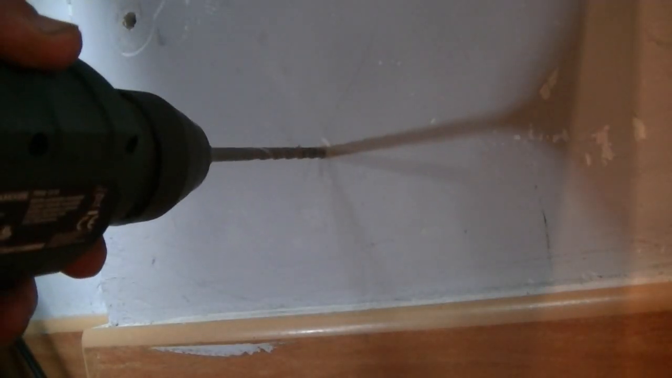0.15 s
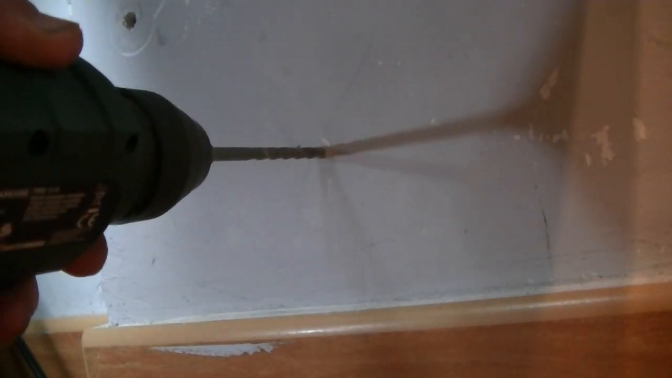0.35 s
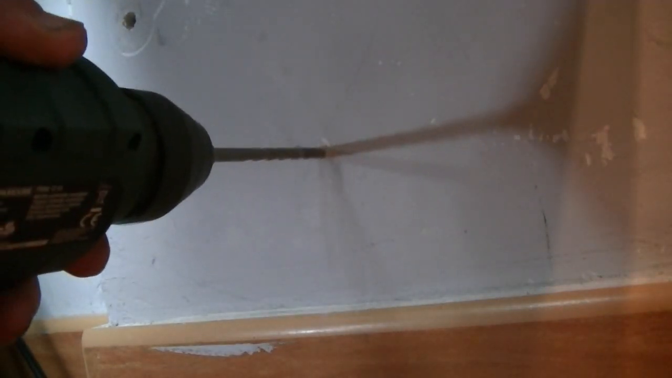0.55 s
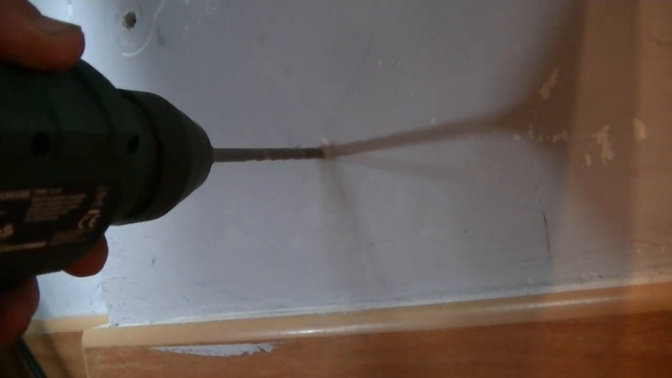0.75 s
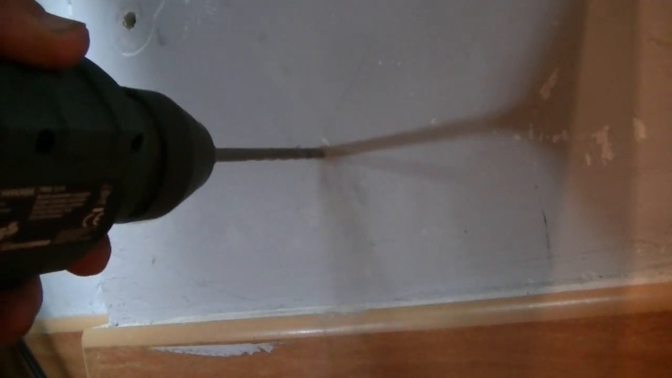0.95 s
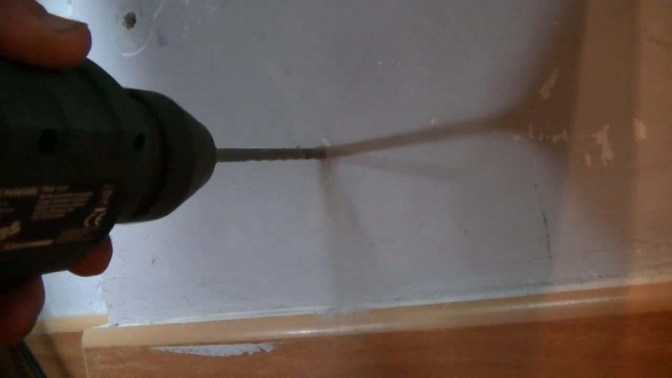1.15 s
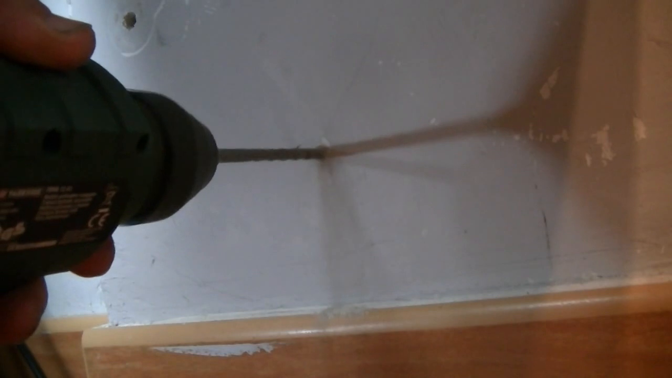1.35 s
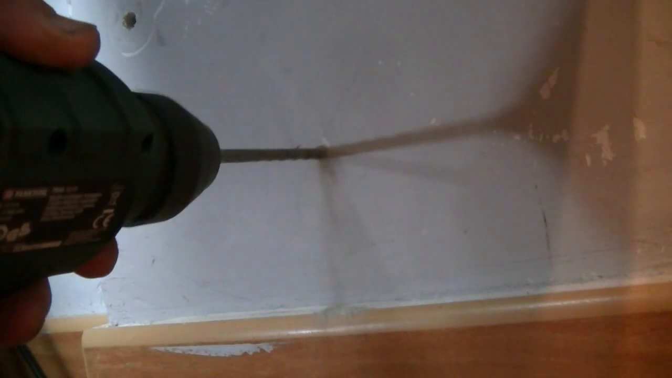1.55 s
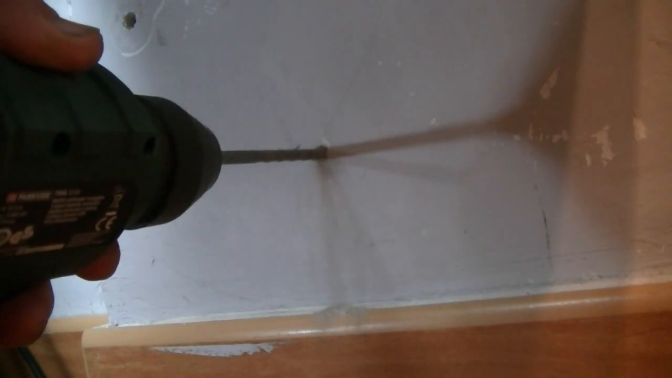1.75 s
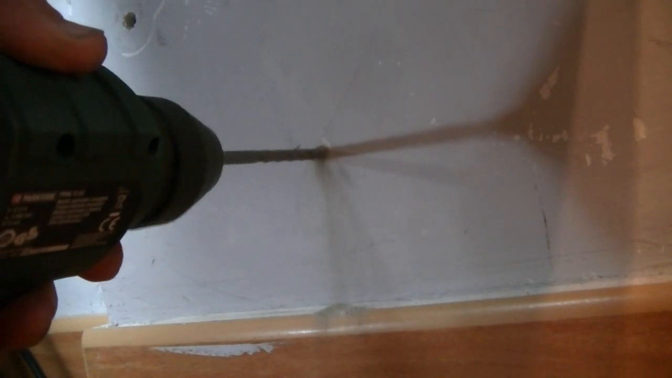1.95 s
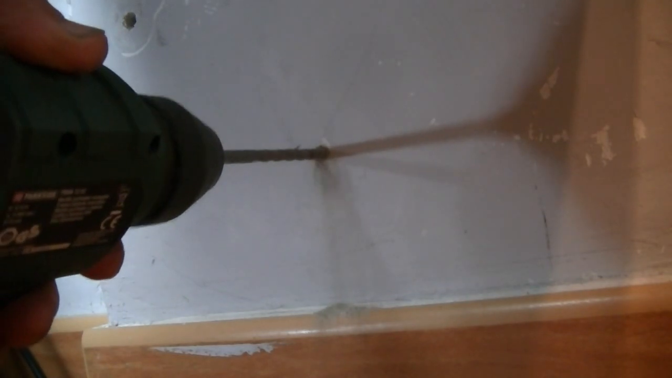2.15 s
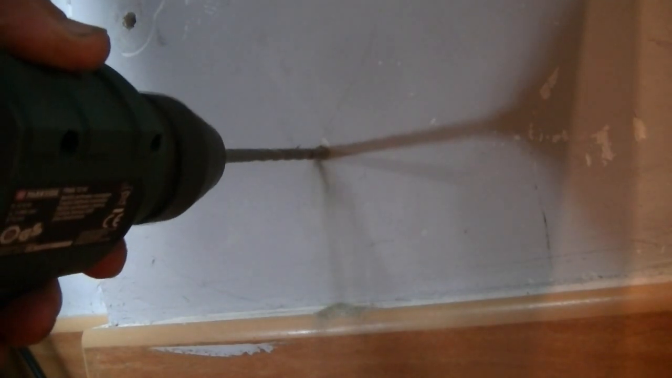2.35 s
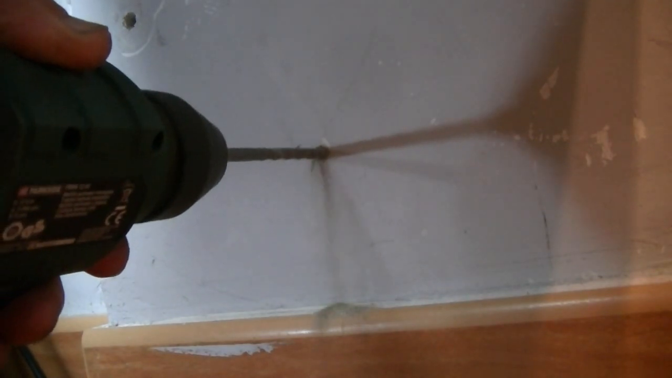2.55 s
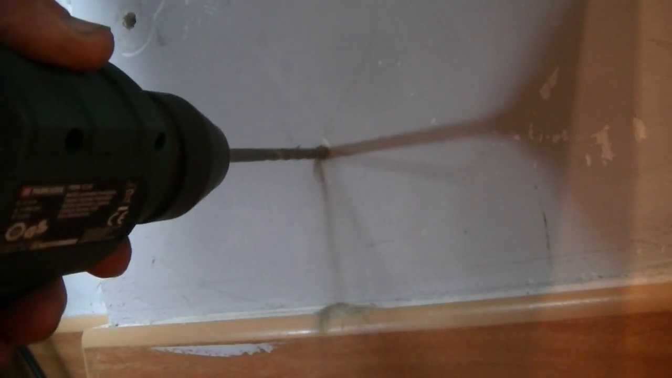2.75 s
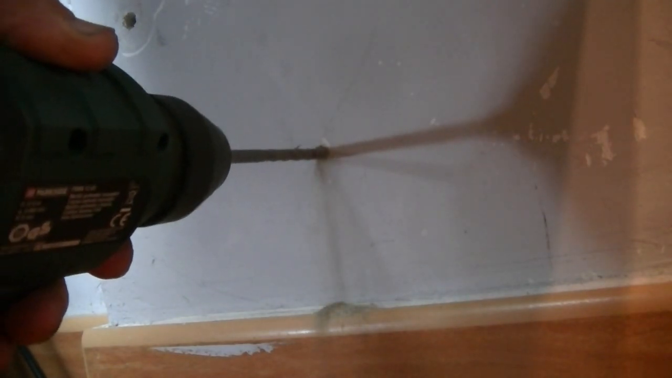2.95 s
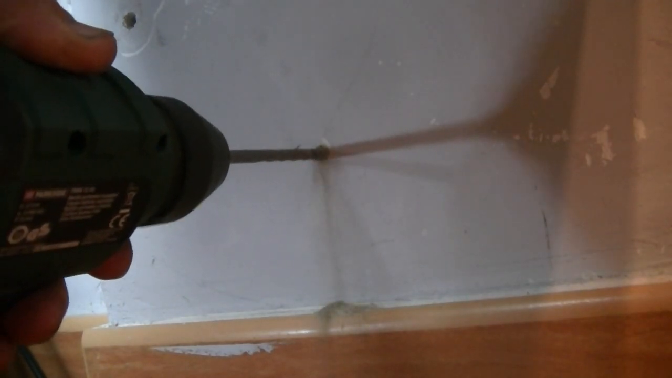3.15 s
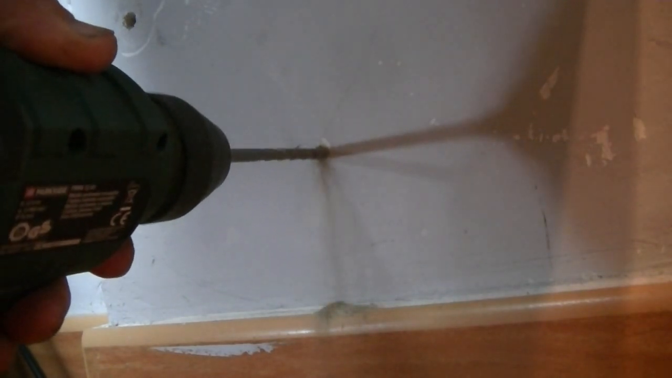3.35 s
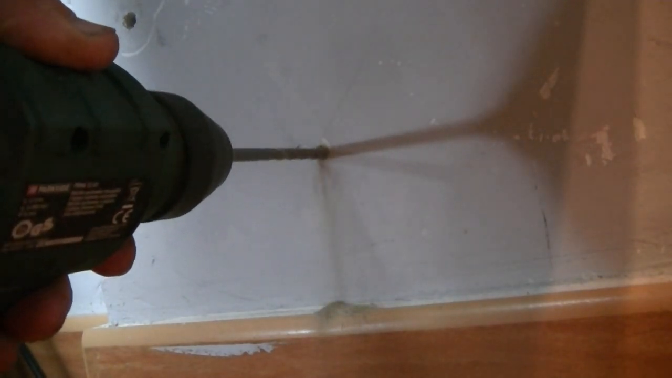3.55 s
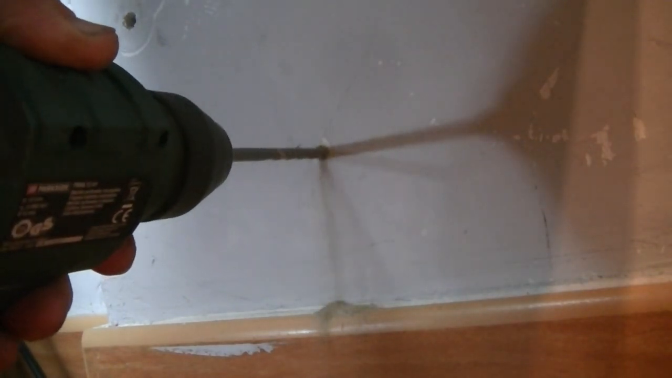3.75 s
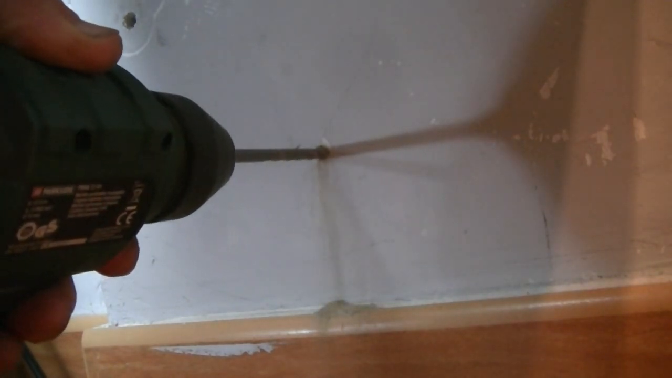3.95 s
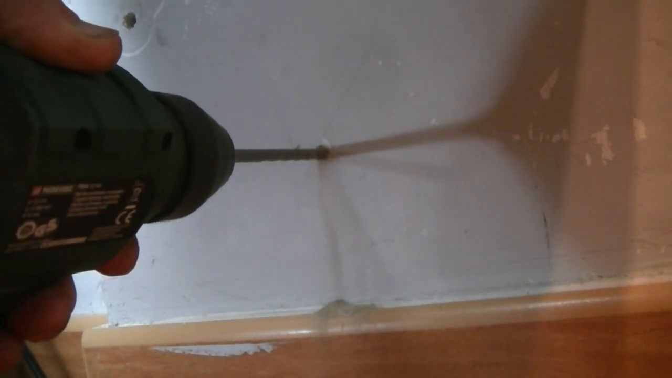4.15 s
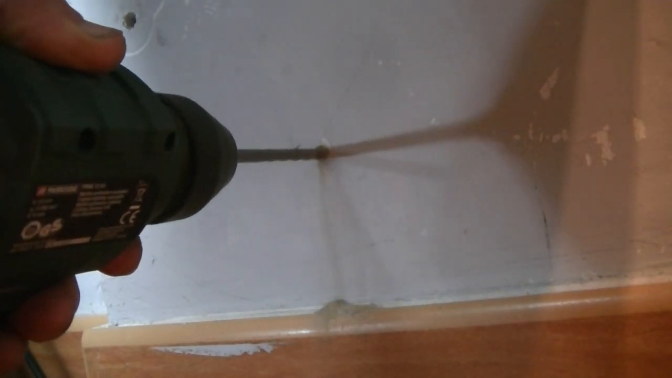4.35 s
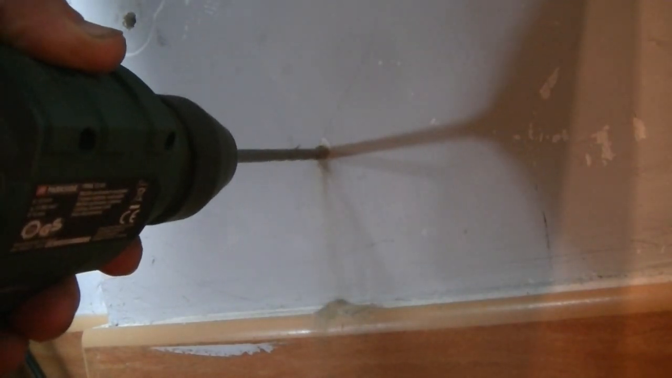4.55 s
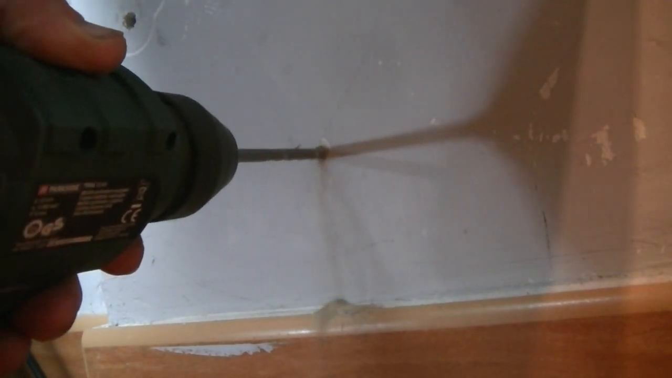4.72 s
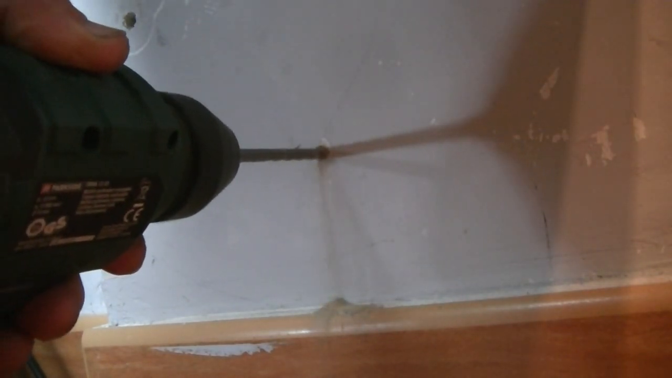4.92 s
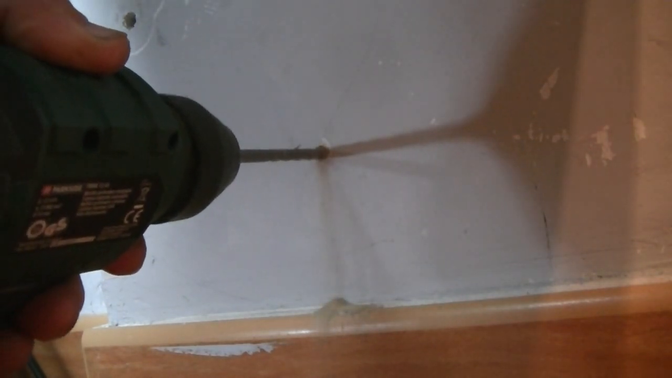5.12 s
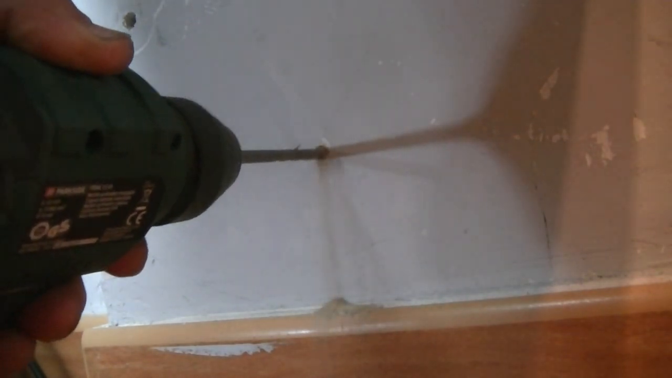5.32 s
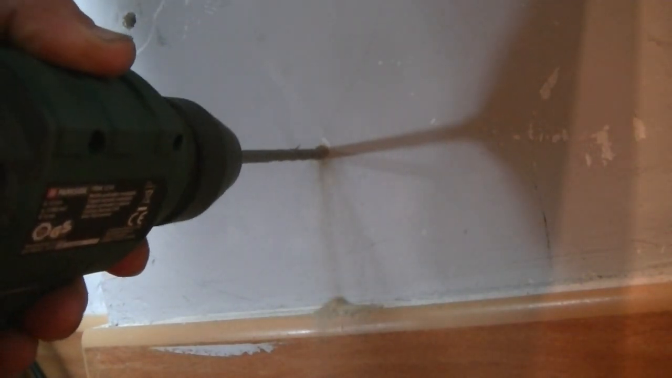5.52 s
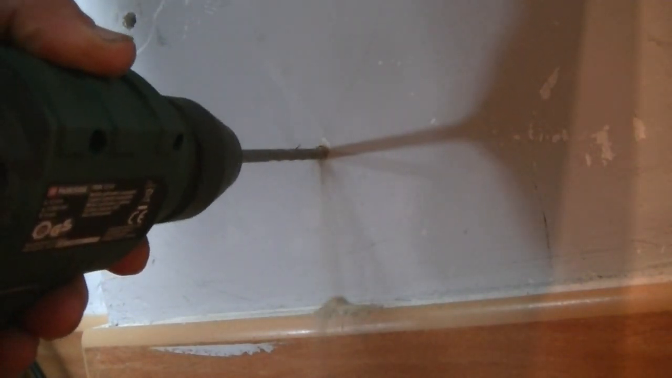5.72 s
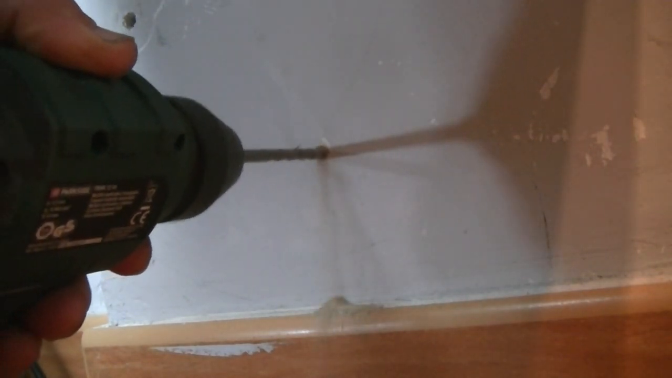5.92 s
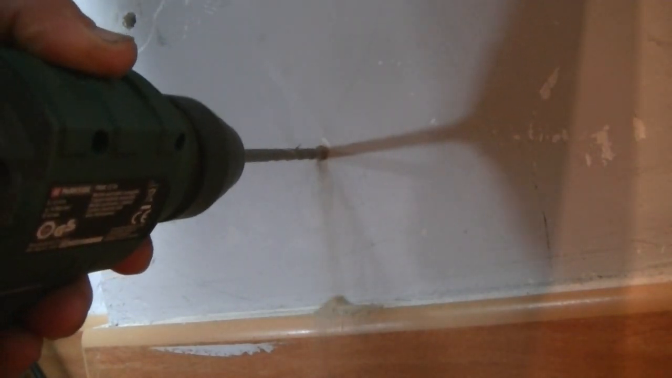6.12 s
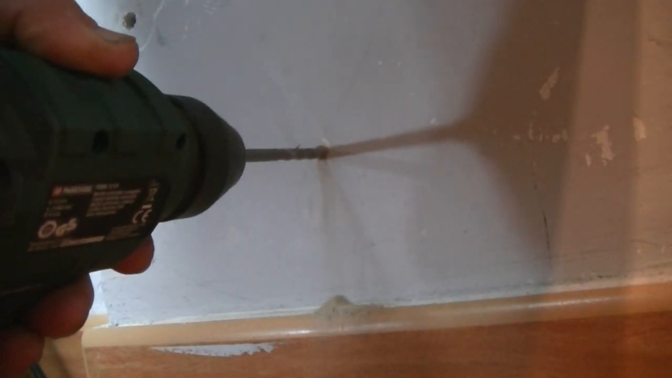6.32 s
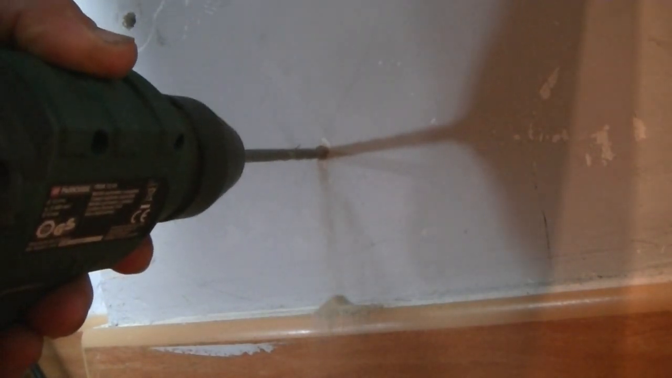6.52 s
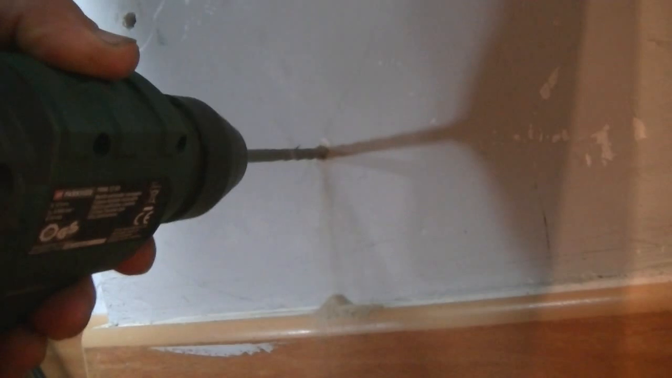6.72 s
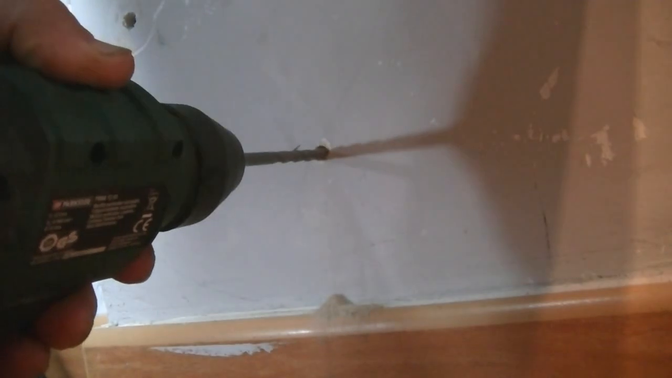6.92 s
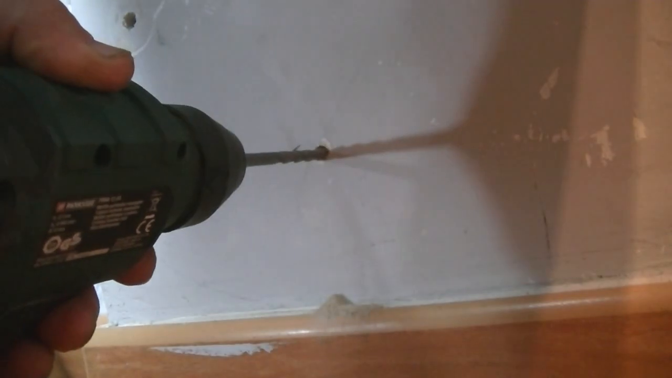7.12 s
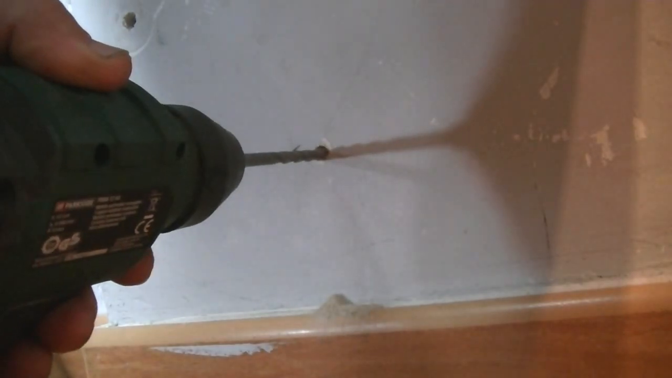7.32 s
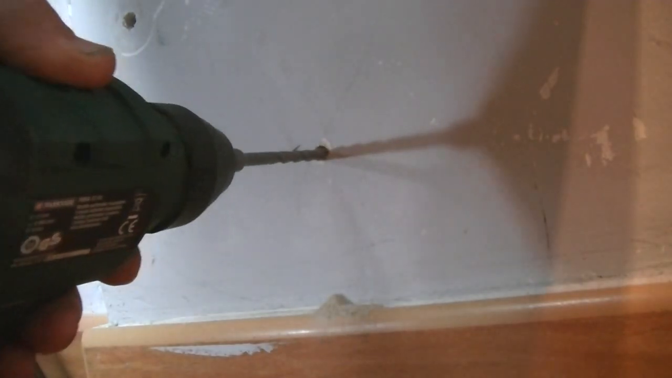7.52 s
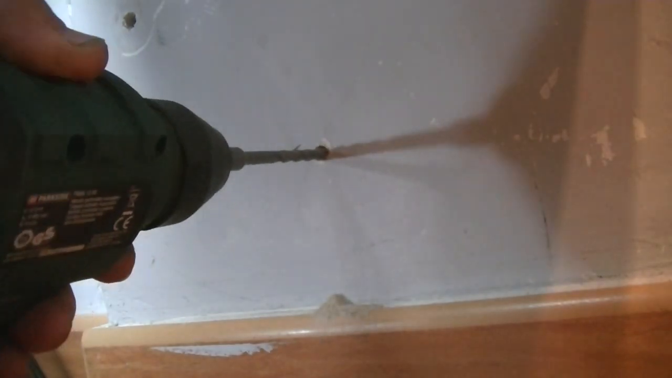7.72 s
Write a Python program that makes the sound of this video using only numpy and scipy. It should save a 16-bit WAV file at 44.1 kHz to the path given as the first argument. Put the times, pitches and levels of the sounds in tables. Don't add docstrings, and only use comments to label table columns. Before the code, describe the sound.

A hammer drill revs up and hammers steadily into a plastered wall, then stops abruptly, followed by small knocks, scrapes and quiet room air.

```python
import sys
import numpy as np
from scipy import signal
from scipy.fft import rfft, irfft, next_fast_len
from scipy.io import wavfile
from scipy.ndimage import uniform_filter1d, map_coordinates

SR = 44100
rng = np.random.default_rng(int(sys.argv[2]) if len(sys.argv) > 2 else 0)


def to_linear_factor(level_db):
    exponent = np.asarray(level_db, float) / 20
    return 10 ** exponent


def dump_mix(stems):
    frames = np.atleast_2d(stems).T
    limited = np.clip(frames, -1, 1)
    pcm = np.round(limited * 32767).astype(np.int16)
    wavfile.write(sys.argv[1], SR, pcm)


N = 347508
T = np.arange(N) / SR
STOP_S = 6.795

# t/s, rate/(blows per s)
CRANK_SPEED = [(0.0, 23.39), (0.07, 32.27), (0.14, 36.75), (0.48, 36.94), (0.53, 41.01), (0.57, 53.62),
               (0.62, 62.01), (0.68, 65.43), (1.05, 66.25), (2.1, 66.75), (2.25, 67.6), (2.55, 66.69),
               (2.85, 67.52), (3.9, 67.43), (6.0, 66.89), (6.66, 66.13), (6.7, 64.4), (6.8, 31.5)]
# t/s, level/dB, steel level/dB
WORKLOAD = [(0, -15.5, -5), (.06, -20, -4), (.35, -21, -2), (.65, -20.5, -4.5), (1, -21, -6),
            (1.4, -20, -10), (1.9, -19.5, -10), (2.8, -20.5, -5), (3.3, -21, -5.5), (4, -21, -8.5),
            (4.7, -21, -7.5), (5.4, -21.5, -9), (6, -21, -8.5), (6.6, -22, -7), (6.72, -22, -2),
            (6.79, -27.5, -4)]
# f/Hz, width/Hz, level/dB
WALL_MODES = [(460, 89, 1.5), (558, 62, 3.5), (622, 38, -11), (737, 70, -5.5), (324.5, 64, -17.5)]
# f/Hz, width/Hz, level/dB
HOLLOW_MODES = [(950, 75, -5), (1209, 70, 1.5), (1441, 50, -2), (1670, 50, 0)]
# f/Hz, width/Hz, level/dB
HOUSING_MODES = [(1950, 135, 4), (2317, 246, -4), (2505, 117, -1.5), (2720, 73, -4), (2850, 26, 0.5),
                 (3420, 187, -6), (3830, 274, -13), (4440, 300, -15)]
# f/Hz, width/Hz, level/dB
SKIN_MODES = [(760, 200, -10.5), (1268, 220, -6.5), (1500, 92, 7.5), (3300, 830, -6)]
# f/Hz, width/Hz, level/dB
STEEL_MODES = [(6370, 750, -3), (9820, 370, 0), (11000, 1100, -10), (14300, 1100, -19)]
# f/Hz, level/(dB per Hz)
GRIND_SLOW_SPECTRUM = [(150, -69), (250, -55), (435, -8.5), (884, -12.5), (1440, -4.5), (4270, -5.5),
                       (7560, -21.5), (10100, -24.5), (12300, -38), (13400, -31), (15600, -54)]
# f/Hz, level/(dB per Hz)
GRIND_FAST_SPECTRUM = [(150, -80.5), (250, -29.5), (458, -13), (535, -15.5), (648, -8.5), (1030, -6.5),
                       (1190, -5.5), (1340, -5.5), (1930, 1.5), (2210, -2.5), (4420, -5.5), (4900, -8),
                       (9970, -21), (13800, -34.5), (15600, -48.5)]
# f/Hz, level/(dB per Hz)
CRACK_SPECTRUM = [(600, -55.5), (1500, -7.5), (3000, -6.5), (5000, -8), (8000, -15), (12000, -20),
                  (15500, -25)]
# t/s, peak level/dB, f/Hz, t60/s, click level/dB
TOOL_KNOCKS = [
    (7.007, -41, 670, 0.1, -47),
    (7.063, -33, 972, 0.13, -40),
    (7.082, -49, 2400, 0.06, -30),
    (7.383, -36.5, 2170, 0.06, -20),
    (7.401, -29, 3420, 0.044, -20),
    (7.425, -30, 2500, 0.06, -22),
    (7.451, -34, 1870, 0.06, -14),
    (7.566, -17.5, 2010, 0.05, -35),
    (7.566, -19, 1390, 0.04, -6.5),
    (7.586, -36, 1260, 0.052, -24),
]
# start t/s, hold/s, fade t60/s, level/dB, brightness/dB
BIT_SCRAPES = [
    (7.064, .014, .03, -61, -30),
    (7.076, 0.035, 0.14, -47.5, -30),
    (7.14, .01, .42, -66, -9),
    (7.38, 0.027, .05, -45, -14),
    (7.42, 0.011, .05, -43.5, -7),
    (7.449, .006, .05, -51, -7),
    (7.582, .052, .04, -51.5, -16),
    (7.854, .03, .05, -45, -13),
]
# f/Hz, level/(dB per Hz)
SCRAPE_SPECTRUM = [(240, -55), (400, -14), (2140, -12), (2430, 5.5), (2860, -8), (4830, -24), (5190, -31),
                   (8400, -26), (8900, -26), (13000, -46)]
# f/Hz, width/Hz, level/dB
LOOSE_BIT_LOW = [(990, 300, -15), (1510, 220, 1.5), (2400, 170, 3), (2790, 200, 0), (3420, 400, -1.5),
                 (4800, 340, -18)]
# f/Hz, width/Hz, level/dB
LOOSE_BIT_HIGH = [(4900, 400, 5.5), (6800, 400, 3), (8260, 500, 1), (10500, 800, -18)]
# start t/s, end t/s, f/Hz, width/Hz, level/dB
DUST_WHISPERS = [(7.062, 7.2, 2400, 120, -61), (7.06, 7.15, 1150, 1200, -57),
                 (7.564, 7.595, 1330, 250, -47), (7.42, 7.45, 2700, 200, -50),
                 (7.013, 7.09, 9500, 900, -74), (7.04, 7.2, 6600, 600, -78), (7.07, 7.18, 11000, 500, -80),
                 (7.27, 7.37, 3900, 200, -77), (7.47, 7.74, 5280, 200, -70.5), (7.6, 7.78, 8200, 400, -80),
                 (7.83, 7.87, 9700, 400, -76)]
# f/Hz, t60/s
ROOM_DECAY = [(150, .12), (300, 0.4), (1000, 0.27), (2000, 0.29), (5000, 0.31), (9000, 0.26), (14000, 0.18)]
# f/Hz, left minus right level/dB
LEFT_OVER_RIGHT = [(250, -.8), (500, -.4), (1000, .3), (2500, .8), (5000, .7), (8000, .1), (14000, .1)]
# t/s, level/dB
AIR_LEVEL = [(6.8, -83), (7, -69), (7.1, -59.5), (7.25, -65), (7.4, -57), (7.55, -54.5), (7.7, -52.5),
             (7.88, -53)]
# f/Hz, level/(dB per Hz)
AIR_SPECTRUM = [(88, -71), (150, -36), (350, -14), (386, -8), (433, -12), (701, -20), (1110, -22),
                (1250, -18.5), (2140, -15.5), (2600, -21.5), (4210, -19.5), (4540, -24.5), (15000, -54.5)]
# f/Hz, width/Hz, level/dB
APPLIANCE_LINES = [(483, 22, 2), (684, 40, -11.5), (3900, 200, -9.5)]
# f/Hz, level/dB
WIND_FILTER = [(20, -52), (150, -41.5), (200, -23), (265, -18.5), (330, -6.5), (420, -6.5), (600, -0.5)]
# f/Hz, level/(dB per Hz)
HISS_SPECTRUM = [(20, -3), (150, -4), (3000, -5), (9000, -4), (15000, -18)]


def unit(x):
    return x / np.sqrt(np.mean(x ** 2) + 1e-20)


def along(points, hz):
    f, v = np.transpose(points)
    return np.interp(np.log(hz + 1), np.log(f + 1), v)


def curves(rows):
    s, *cols = np.transpose(rows)
    return [np.interp(T, s, c) for c in cols]


def wobble(rate):
    return map_coordinates(rng.standard_normal(int(N * rate / SR) + 4), [T * rate])


def noise(*rows):
    return rng.standard_normal((*rows, N))


def filtered(x, response):
    m = next_fast_len(N + 8192)
    return irfft(rfft(x, m) * response(np.fft.rfftfreq(m, 1 / SR)), m)[..., :N]


def coloured(x, spectrum):
    return unit(filtered(x, lambda hz: to_linear_factor(along(spectrum, hz))))


def rung(x, modes):
    def response(f):
        total = 0
        for k, (centre, width, db) in enumerate(modes):
            damping = 1j * f * width
            total = total + (-1) ** k * to_linear_factor(db) * damping / (centre * centre - f * f + damping)
        return total
    return unit(filtered(x, response))


def pulses(times, sizes):
    at = times[:, None] * SR
    k = at.astype(int) + np.arange(16) - 8
    shape = np.sinc(k - at) * np.cos(np.pi * (k - at) / 18) ** 2
    return np.bincount(np.clip(k, 0, N - 1).ravel(), (sizes[:, None] * shape).ravel(), N)


def bursts(hits, rise, t60):
    t = np.arange(SR // 20) / SR
    envelope = (1 - np.exp(-t / rise)) * to_linear_factor(-60 * t / t60)
    return signal.fftconvolve(hits, envelope)[:N] * noise()


def strikes(rate, turn):
    at = np.interp(np.arange(436), turn, T, left=-.0125)
    luck = rng.standard_normal((len(at), 6))
    blow_s = at - .0005 + .00003 * luck[:, 0]
    flight = .0137 + .0005 * np.clip(36.5 - np.interp(at, T, rate), 0, 12)
    back_s = at + flight + .00006 * luck[:, 1]
    blows = pulses(blow_s[1:], to_linear_factor(0.45 * luck[1:, 2]))
    backs = pulses(back_s, to_linear_factor(1.3 * luck[:, 3]))
    thumps = pulses(at + flight - .0028, to_linear_factor(0.36 * luck[:, 4]))
    jolt = bursts(pulses(blow_s[1:], to_linear_factor(2.8 * luck[1:, 5])), 0.00053, 0.011)
    return blows, backs, thumps, jolt


def pressure(part, fast):
    lift = np.exp(-((part - .36 + .06 * fast) / (.15 - .04 * fast)) ** 2)
    return to_linear_factor(-8.5 * lift + 3 * part + 0.6 * wobble(150) + 0.4 * wobble(8))


def worn_teeth(part):
    teeth = rng.standard_normal(256) + .35 * rng.standard_normal((32, 256))
    return map_coordinates(teeth, [T * 3.5, part * 256], mode="grid-wrap")


def wall_and_housing(blows, backs, thumps, chatter, fast, depth):
    seating_db = -20 * np.exp(-T / 0.018)
    wall_db = -17 + 7 * fast - 0.8 * depth
    hollow_db = -6 - 3 * fast - 1.5 * depth + seating_db
    skin_db = -8 * np.clip(depth * 3.0, 0, 1) - 6 * fast + seating_db / 2
    wall = rung(thumps + 0.15 * backs + 0.029 * bursts(backs, 0.0016, 0.035), WALL_MODES)
    hollow_drive = blows - 0.29 * backs + 0.011 * chatter
    hollow = rung(hollow_drive + 0.071 * bursts(blows, 0.0017, 0.034), HOLLOW_MODES)
    housing_drive = .8 * blows + backs + .028 * chatter
    housing = rung(housing_drive + .065 * bursts(blows + backs, .0003, .018), HOUSING_MODES)
    skin = rung(blows + 0.04 * bursts(blows, 0.0003, .01), SKIN_MODES)
    click = rung(backs, [(2530, 590, 0)])
    thud = rung(rung(blows, [(206, 360, 0)]), [(209, 280, 0)])
    rattle = rung(chatter, [(442.0, 30, 0.5), (640, 82, -3.5), (917, 260, -2.0)])
    shank = rung(blows + backs, [(3850, 140, 0)])
    body = to_linear_factor(wall_db - 2.0) * wall + to_linear_factor(hollow_db - 3.5) * hollow
    body = body + to_linear_factor(-6.5) * housing + to_linear_factor(-4.0) * to_linear_factor(skin_db) * skin
    body = body + to_linear_factor(-15 + 5.6 * fast - 9.8 * depth) * click
    body = body + to_linear_factor(-30) * to_linear_factor(4.4 * (1.0 - fast)) * thud
    body = body + to_linear_factor(-16.5 - 10.7 * fast) * rattle + to_linear_factor(-30 + 14 * depth) * shank
    return filtered(body, lambda f: 1 / (1 + 1j * f / 5500 - (f / 5500) ** 2) ** 2)


def cracking_stone(blows, backs):
    splinters = bursts(blows, 0.00024, 0.028) + 0.085 * bursts(backs, .0002, 0.0045)
    return coloured(0.4 * blows + splinters, CRACK_SPECTRUM)


def ringing_steel(jolt, grit, depth):
    tip = rung(jolt, [(13430, 290, 0)])
    lower = rung(jolt + 0.85 * grit, [(8580, 150, 0)])
    return rung(jolt, STEEL_MODES) + to_linear_factor(-6.5 - 16 * depth) * tip + to_linear_factor(-15.5 + 7.0 * depth) * lower


def grinding(grit, fast):
    slow_grind = np.sqrt(1 - fast) * coloured(grit[0], GRIND_SLOW_SPECTRUM)
    return slow_grind + np.sqrt(fast) * coloured(grit[1], GRIND_FAST_SPECTRUM)


def gear_whine(turn, press, fast):
    mesh = 2 * np.pi * 64 * turn + .3 * wobble(25)
    load = unit(press ** 1.15) * to_linear_factor(0.3 * wobble(30)) * fast ** 1.4
    tones = np.sin(mesh) + 0.85 * np.sin(mesh + 2 * np.pi * turn + 1.1)
    tones = tones + 0.4 * np.sin(mesh - 4 * np.pi * turn - 1.9)
    tones = tones + 0.45 * np.sin(mesh - 12 * np.pi * turn) + 0.45 * np.sin(mesh - 16 * np.pi * turn)
    return load * tones


def motor(turn, press, fast, depth):
    gear_db = -10 - 9 * depth ** 2
    hum = (1 - fast) * np.clip(T / .12, 0, 1) * np.sin(2 * np.pi * 12 * turn)
    rumble = coloured(noise(), [(20, 0), (120, -7), (200, -17.5), (400, -59.5)])
    fan = coloured(noise(), [(3000, -21.0), (6000, -2.5), (10000, -5.5), (13500, -10.5), (15500, -18.5)])
    whine = to_linear_factor(gear_db) * gear_whine(turn, press, fast)
    return whine + to_linear_factor(-12) * hum + to_linear_factor(-20.5) * rumble + to_linear_factor(-26.0) * fan


def drill():
    rate, = curves(CRANK_SPEED)
    fast = np.clip((rate - 38) / 26, 0, 1)
    flutter = .014 * fast ** 4 * wobble(7)
    turn = .49 + np.cumsum(rate) / SR + flutter
    part = turn % 1
    depth = T / STOP_S
    tool_db, steel_db = curves(WORKLOAD)
    running = to_linear_factor(-60 * np.clip(T - STOP_S, 0, 1) / 0.053)
    blows, backs, thumps, jolt = strikes(rate, turn)
    press = pressure(part, fast)
    grit = press * running * noise(2)
    chatter = press * running * worn_teeth(part)
    mix = wall_and_housing(blows, backs, thumps, chatter, fast, depth)
    mix = mix + to_linear_factor(-12.5) * cracking_stone(blows, backs)
    mix = mix + to_linear_factor(steel_db - 10) * ringing_steel(jolt, grit[0], depth)
    mix = mix + to_linear_factor(-5.5) * grinding(grit, fast)
    mix = mix + running * motor(turn, press, fast, depth)
    return to_linear_factor(tool_db) * mix


def knocks():
    out = np.zeros(N + SR)
    t = np.arange(SR // 5) / SR
    partials = [(.62, 0.11), (1, 0.48), (1.8, .5), (2.6, 0.17)]
    for s, db, hz, t60, click_db in TOOL_KNOCKS:
        ring = 0
        for ratio, share in partials:
            ring = ring + share * np.sin(2 * np.pi * hz * ratio * t) * to_linear_factor(-60 * t * ratio / t60)
        smooth = uniform_filter1d(rng.standard_normal(len(t)), size=24)
        shiver = 0.46 + 2.5 * uniform_filter1d(smooth, size=10)
        click = to_linear_factor(click_db - 4.0 - 60 * t / .02) * rng.standard_normal(len(t))
        knock = ring * (1 - np.exp(-t / 0.0005)) * shiver + click
        out[round(s * SR):][:len(t)] += to_linear_factor(db - 2.5) * knock
    return out[:N]


def scrapes():
    out = np.zeros(N)
    grit = to_linear_factor(3.2 * wobble(900)) * noise(3)
    dull = unit(coloured(grit[0], SCRAPE_SPECTRUM) + 1.3 * rung(grit[1], LOOSE_BIT_LOW))
    bright = rung(rung(grit[2], LOOSE_BIT_HIGH), [(7000, 7000, 7.5)])
    for start, hold, t60, db, bright_db in BIT_SCRAPES:
        rise = 1 - np.exp(-np.clip(T - start, 0, 1) / .004)
        fade = to_linear_factor(-60 * np.clip(T - start - hold, 0, 1) / t60)
        out += rise * fade * to_linear_factor(db - 2.0) * (dull + to_linear_factor(bright_db + 6.5) * bright)
    return out


def dust():
    out = np.zeros(N)
    for start, end, hz, width, db in DUST_WHISPERS:
        swell = np.sqrt(np.abs(np.sin(np.pi * np.clip((T - start) / (end - start), 0, 1))))
        band = unit(filtered(noise(), lambda f: 1 / (1 + (2 * (f - hz) / width) ** 4)))
        out += to_linear_factor(db) * swell * band
    return out


def handling():
    return filtered(knocks() + scrapes() + dust(), lambda f: 1 / (1 + (f / 11500) ** 8))


def room(x):
    hz, t, z = signal.stft(rng.standard_normal((2, SR // 2)), SR, nperseg=256)
    decay = to_linear_factor(-60 * t / along(ROOM_DECAY, hz)[:, None])
    own, shared = signal.istft(z * decay, SR, nperseg=256)[1]
    x = filtered(x, lambda f: 1 / (1 + (280 / (f + 1)) ** 6))
    tail = np.array([shared + 0.51 * own, shared - 0.43 * own]) / np.linalg.norm(shared)
    return signal.fftconvolve(np.pad(x, (200, 0))[None], tail, axes=1)[:, :N]


def air():
    level_db, = curves(AIR_LEVEL)
    a, b, c = noise(3)
    mid = coloured(a * to_linear_factor(1.5 * wobble(26)), AIR_SPECTRUM) + 0.21 * rung(b, APPLIANCE_LINES)
    mid = mid + 1.4 * coloured(b, [(100, 9.5), (250, -3.5), (330, -5.5), (500, -54)])
    mid = mid + 0.38 * to_linear_factor(2.5 * wobble(9.5)) * np.sin(2 * np.pi * 384 * T)
    side = .25 * coloured(c, AIR_SPECTRUM)
    return to_linear_factor(level_db) * np.array([mid + side, mid - side])


def scene():
    near = drill() + handling()
    sides = np.array([[1], [-1]])
    direct = filtered(near, lambda hz: to_linear_factor(along(LEFT_OVER_RIGHT, hz) / 2 * sides))
    t = np.arange(SR // 100) / SR
    scatter = np.diff(rng.standard_normal(len(t)) * to_linear_factor(-60 * t / 0.0068))
    scattered = signal.fftconvolve(near, scatter / np.linalg.norm(scatter))[:N]
    direct = direct + to_linear_factor(-36.5) * sides * scattered
    return direct + to_linear_factor(-14) * room(near) + air()


def top_cut(x):
    return signal.sosfilt(signal.butter(12, 15780, fs=SR, output="sos"), x)


def record(dry):
    a, b = noise(2)
    hiss = to_linear_factor(-84) * np.array([coloured(a + .4 * b, HISS_SPECTRUM), coloured(a - .4 * b, HISS_SPECTRUM)])
    mix = filtered(dry, lambda hz: to_linear_factor(along(WIND_FILTER, hz))) + hiss
    return top_cut(mix)


dry = scene()
out = record(dry)
dump_mix(out)
```